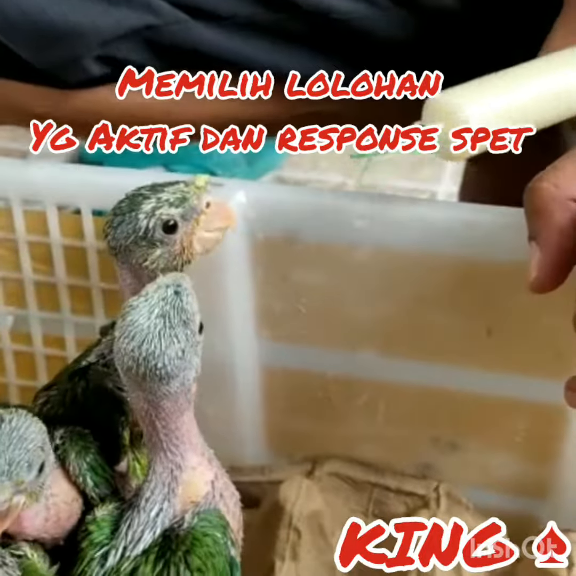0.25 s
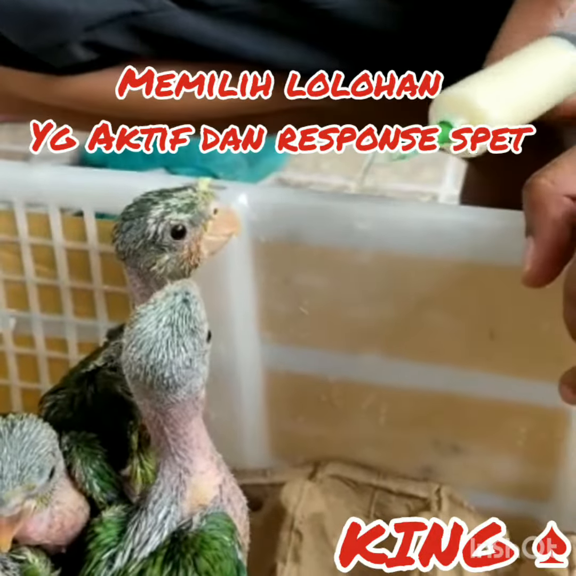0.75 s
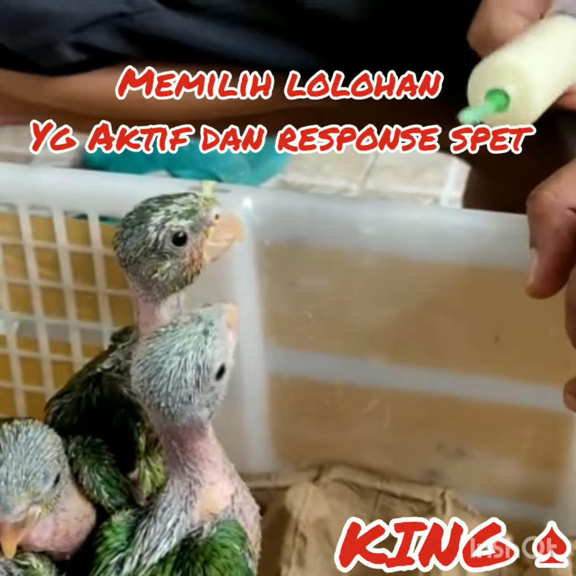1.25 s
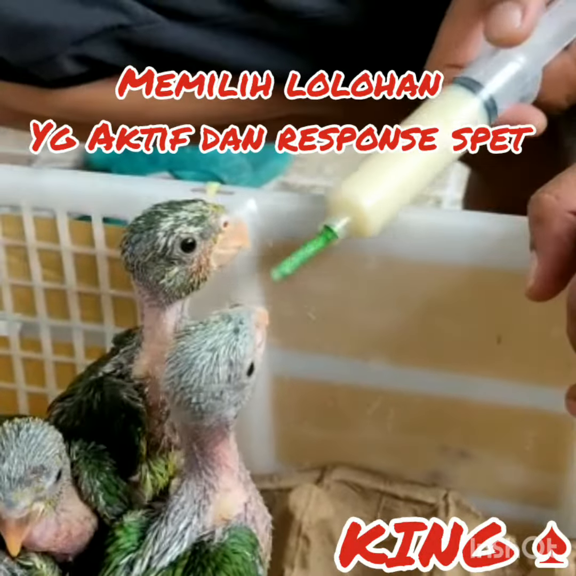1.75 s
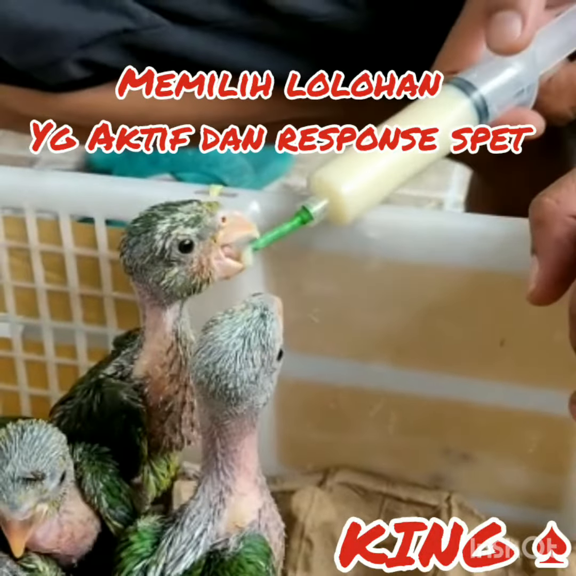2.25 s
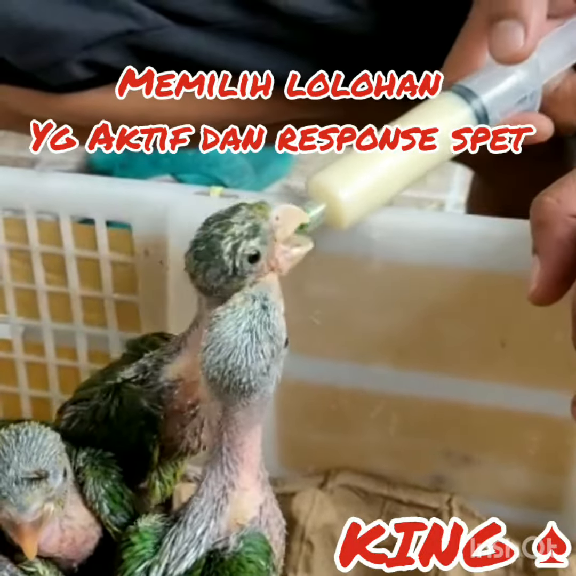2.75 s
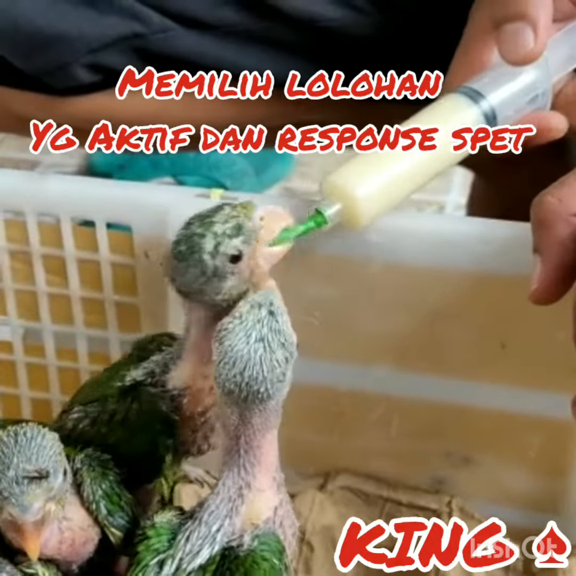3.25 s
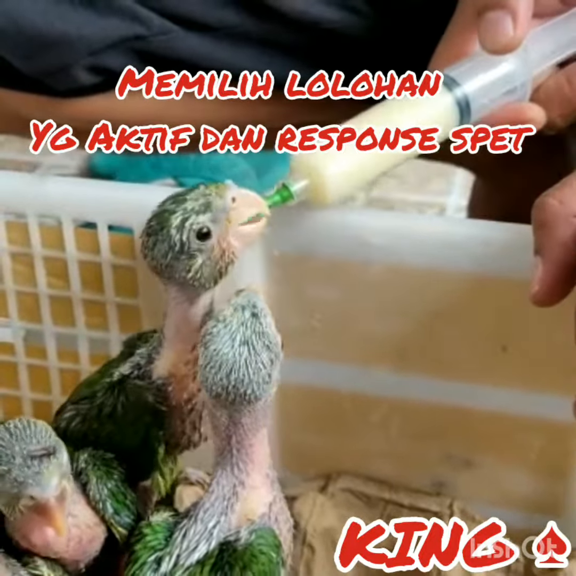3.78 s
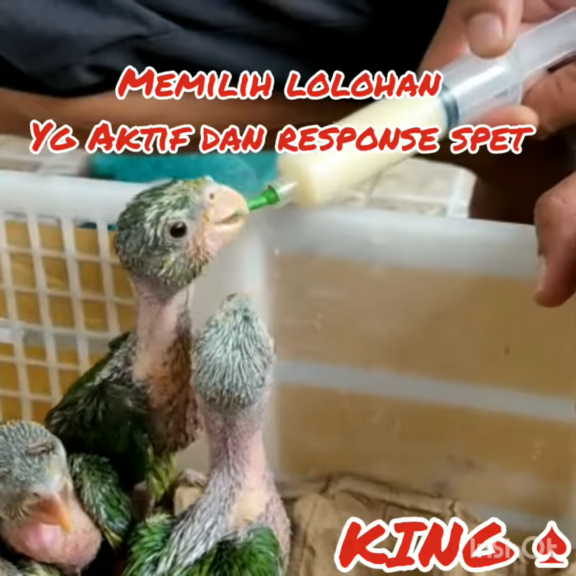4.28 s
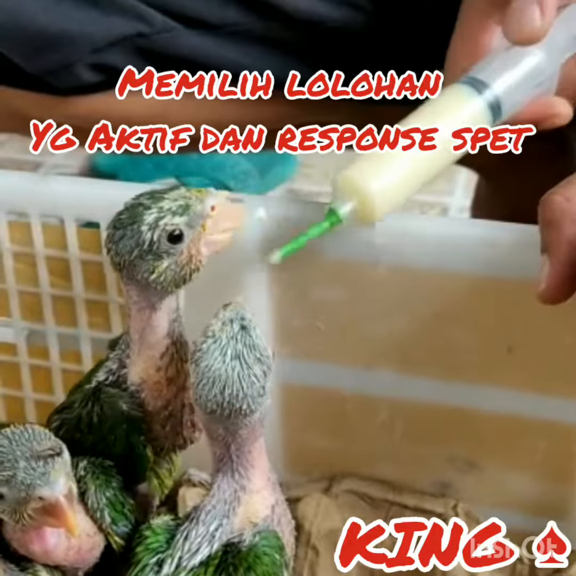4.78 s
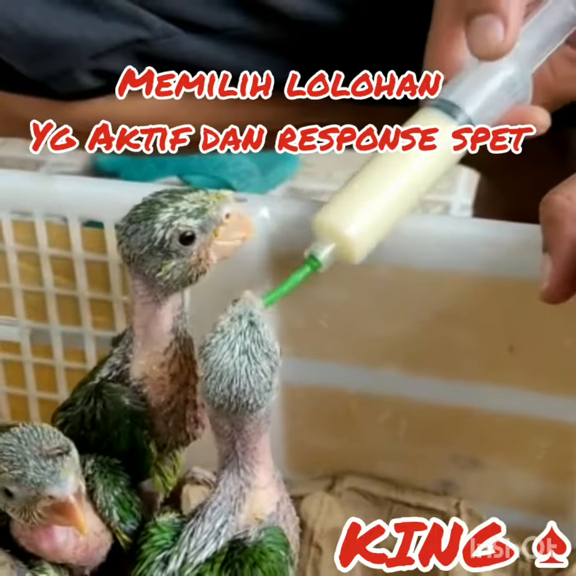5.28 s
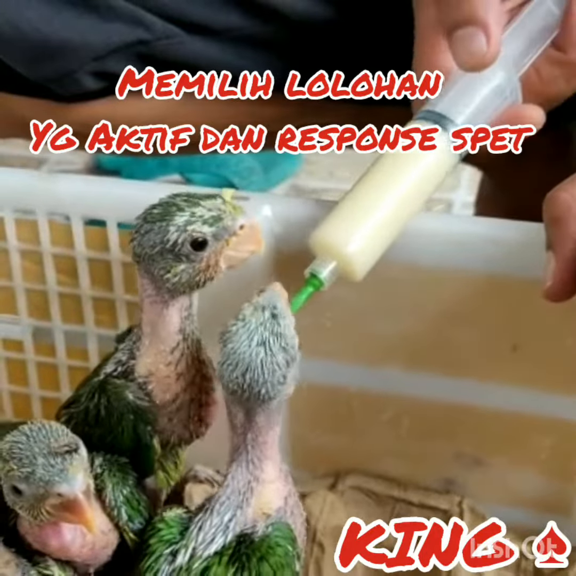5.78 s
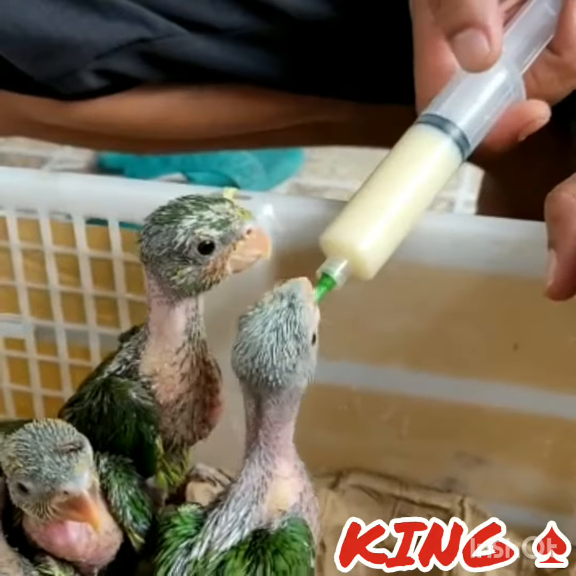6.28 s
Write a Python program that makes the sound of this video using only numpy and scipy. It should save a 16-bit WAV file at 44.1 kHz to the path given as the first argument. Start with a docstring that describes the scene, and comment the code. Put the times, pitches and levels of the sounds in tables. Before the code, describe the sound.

Close raspy begging calls from young parakeets come in three separated bursts over a faint room hum, with soft bumps, wet clicks and one late distant peep.

```python
"""Parakeet chicks in a plastic tub beg in three bursts, close to a stereo microphone, while a syringe feeds them.
Each call starts as an irregular rasp, snaps into a short arched squeal of eight partials and falls back into rasp.
A small room hums under it, with faint swells of hiss; the tub is bumped, beaks tick and husky chirps slip out.
Near the end a bird peeps further off, a wavering whistle heard mostly by way of the room.
Bumps are decaying tones and clacks, ticks are noise clicks, and the walls and room answer with noise echoes."""
import sys
import numpy as np
from scipy import signal
from scipy.fft import rfft, irfft, next_fast_len
from scipy.io import wavfile
from scipy.ndimage import uniform_filter1d

SR = 44100
rng = np.random.default_rng(int(sys.argv[2]) if len(sys.argv) > 2 else 0)


def pcm_store(signal):
    """Save signal as 16-bit PCM."""
    levels = np.round(np.clip(np.atleast_2d(signal), -1, 1) * 32767)
    wavfile.write(sys.argv[1], SR, levels.astype(np.int16).T)


N = 287973


def amp(db):
    """Decibels to gain."""
    return 10 ** (np.asarray(db) / 20)


def unit(x):
    """Scale to rms 1."""
    return x / np.sqrt(np.mean(x ** 2) + 1e-20)


def along(points, hz, axis=1):
    """Read one column of a frequency table on a log axis."""
    table = np.array(points, float)
    return np.interp(np.log(hz + 1), np.log(table[:, 0] + 1), table[:, axis])


def curves(rows, t):
    """Each column after the time, read at times t."""
    s, *cols = np.transpose(rows)
    return [np.interp(t, s, c) for c in cols]


def add(track, s, sound):
    """Mix a sound into a track from time s."""
    start = round(s * SR)
    part = sound[max(-start, 0):max(N - start, 0)]
    track[max(start, 0):][:len(part)] += part


def filtered(x, response):
    """x times a response of frequency."""
    length = x.shape[-1]
    size = 2 * next_fast_len(length // 2 + SR // 8)
    return irfft(rfft(x, size) * response(np.fft.rfftfreq(size, 1 / SR)), size)[..., :length]


def causal(gain):
    """The minimum-phase response with this gain."""
    cepstrum = irfft(np.log(np.maximum(gain, 1e-6)))
    half = len(cepstrum) // 2
    cepstrum[1:half] *= 2
    cepstrum[half + 1:] = 0
    return np.exp(rfft(cepstrum))


def band(hz, centre_hz, half_width_hz):
    """A resonance with steep skirts, 6 dB down at the half width."""
    return 1 / (1 + 1j * (hz - centre_hz) / half_width_hz) ** 2


def rush(gain, side_db):
    """Coloured stereo noise of rms 1."""
    mid, side = filtered(rng.standard_normal((2, N)), gain)
    side = amp(side_db) * side
    return unit(np.array([mid + side, mid - side]))


def rasp(t, before, after, effort, scatter_db, air, uneven):
    """Loose membranes slap irregularly, faster as they tighten towards the squeal; each slap lets out a puff of air."""
    # mean slap rate [Hz]: at the start of the rasp, next to the squeal, at the end
    flap_rates = (560.4, 1198.7, 622.6)
    slack_hz, tight_hz, spent_hz = flap_rates
    flap_hz = np.interp(t, [-before, 0, .028, after], [slack_hz, tight_hz, tight_hz, spent_hz])
    turns = np.cumsum(1 + min(uneven, 1) * rng.uniform(-1, 1, size=len(t) // 16))
    at = np.searchsorted(np.cumsum(flap_hz) / SR, turns)
    at = at[at < len(t)]

    slaps = np.zeros(len(t))
    strength_db = scatter_db * np.clip(rng.standard_normal(len(at)), -2, 1)
    slaps[at] = amp(strength_db) / np.sqrt(flap_hz[at])
    puff_decay = np.exp(-1 / (SR * 0.0014))
    puffs = signal.lfilter([1], [1, -puff_decay], slaps) * rng.standard_normal(len(t))
    slaps = slaps - uniform_filter1d(slaps, size=128)  # takes out the slow push

    # the rasp swells, thins while the squeal holds, returns and dies away
    start_db, swell_db, locked_db, return_db, late_db = effort
    when = [-before - .004, -before + 0.0059, -.002, .005, .022, .029, after - .012, after, after + 0.024]
    levels = [-45, start_db, swell_db, locked_db, locked_db, return_db, late_db, late_db - 7.0, -32]
    effort_db = np.interp(t, when, levels, left=-120, right=-120)
    return unit(unit(slaps) + air * unit(puffs)) * amp(effort_db)


def squeal(t, top_hz, chick, syrinx, jitter, vary_db):
    """The membranes lock into a regular vibration; their tension, and so the pitch, rises to a crest and drops faster."""
    crest, rise, fall, attack, length, shimmer_db, crest_db = chick
    arch_sag, arch_power = .29, 2.1  # log pitch lost one rise or fall time off the crest; flatness of the crest
    lowest_share, release_s = .6, 0.0089  # lowest pitch over top pitch; time the squeal takes to break up
    slack_jitter = 0.041  # extra unsteadiness per share of pitch lost: slack membranes wobble
    lead_s = 0.0031  # the fundamental sounds this much before and after its overtones

    def waver():
        return unit(uniform_filter1d(rng.standard_normal(len(t)), size=20))

    def gate(lead):
        """The squeal breaks in and out within a few milliseconds."""
        opening = np.clip((t + lead) / attack + .5, 0, 1)
        closing = np.clip((length + lead - t) / release_s + .5, 0, 1)
        return opening * closing

    off_crest = np.abs((t - crest) / np.where(t < crest, rise, fall))
    arch = np.maximum(np.exp(-arch_sag * off_crest ** arch_power), lowest_share)
    pitch = top_hz * arch * (1 + (jitter + slack_jitter * (1 - arch)) * waver())
    phase = 2 * np.pi * np.cumsum(pitch) / SR

    partials = np.zeros(len(t))
    for k in range(1, 9):
        # the balance of partials differs from call to call
        strength = amp(along(syrinx, k * pitch) + rng.normal(0, vary_db))
        partials += strength * gate(lead_s * (k == 1)) * np.sin(k * phase)
    # the tight membranes swing less at the crest than on the way up and down
    return partials * amp(shimmer_db * waver() + crest_db * np.exp(-(off_crest / 0.75) ** 2))


def radiate(source, beak):
    """Throat and beak colour the call, which reaches the two ports by different paths."""
    def response(hz):
        throat = causal(unit(amp(along(beak, hz))))
        tilt = amp(along(beak, hz, axis=2) / 2)
        turn = np.exp(.5j * along(beak, hz, axis=3))
        ports = np.array([tilt * turn, 1 / (tilt * turn)])
        return throat * ports / np.sqrt((tilt ** 2 + tilt ** -2) / 2)
    return filtered(source, response)


def tub_walls(x, t60):
    """Quick, weak reflections between the walls of the tub."""
    t = np.arange(SR // 20) / SR
    echoes = rng.standard_normal((2, len(t))) * amp(-60 * t / t60) * (t > .001)
    echoes = echoes / np.linalg.norm(echoes, axis=1, keepdims=True)
    return signal.fftconvolve(np.atleast_2d(x), echoes, axes=1)[:, :N]


def room(x, gap):
    """A diffuse tail, faded in over the gap [s], in which each frequency dies at its own speed."""
    # decay of the small room: (f/Hz, t60/s)
    decay = [(200, 1), (1000, 0.91), (3500, 0.39), (7000, 0.385), (14000, 0.19)]
    hz, t, z = signal.stft(rng.standard_normal((2, SR * 3 // 4)), SR, nperseg=256)
    tail = signal.istft(z * amp(-60 * t / along(decay, hz)[:, None]), SR, nperseg=256)[1]
    tail = tail * np.clip(np.arange(tail.shape[1]) / SR / gap, 0, 1)
    return signal.fftconvolve(np.atleast_2d(x), tail / np.linalg.norm(tail[0]), axes=1)[:, :N]


def thin_centre(pair, centre_hz, half_width_hz, depth_db):
    """Lowers the centre of the stereo image in one narrow band."""
    mid, side = (pair[0] + pair[1]) / 2, (pair[0] - pair[1]) / 2

    def dip(hz):
        return causal(amp(depth_db / (1 + ((hz - centre_hz) / half_width_hz) ** 4)))
    mid = filtered(mid, dip)
    return np.array([mid + side, mid - side])


def begging():
    """One chick gives the first two bursts; a lower, rougher one with a softer attack gives the third.
    The head holds its place through a burst, so its calls are much alike."""
    # begging calls: (squeal onset t/s, top pitch f/Hz, squeal level/dB, rasp level/dB,
    #                 rasp before t/s, rasp after t/s, burst counted from 0)
    begs = [(0.0434, 1977, -17.5, -16, .044, .046, 0), (.1650, 1925, -17, -16.5, .035, .044, 0),
            (0.3067, 1896, -17.5, -16, .036, .043, 0), (2.4955, 2005, -16, -15, .039, 0.046, 1),
            (2.5986, 2070, -15.5, -14.5, .044, .05, 1), (2.7167, 2014, -15.5, -14, .044, .046, 1),
            (2.8518, 1943, -16.5, -16.5, .038, .049, 1), (4.2899, 1825, -16.5, -17.5, .031, .053, 2),
            (4.3842, 1848, -15.5, -16.5, .031, .05, 2), (4.4948, 1839, -15.5, -14.5, .028, .046, 2),
            (4.6191, 1830, -16, -17, .033, .051, 2)]
    # each chick's squeal: (onset to crest t/s, pitch rise t/s, pitch fall t/s, attack t/s, length t/s,
    #                       rough shimmer level/dB, level at the crest/dB)
    chick_a, chick_b = (.0172, .0136, .0093, .0045, 0.028, 1.0, -1.8), (.018, .0174, .016, 0.012, 0.025, 1.7, -1.2)
    # strength of the squeal's partials at the syrinx: (f/Hz, level/dB)
    syrinx_a, syrinx_b = [(1200, -7.5), (1500, -10), (2000, -10), (2700, -3), (3300, -3), (4000, -0.5),
                          (5000, -6), (6000, -2.5), (6800, 4), (7700, -8.5), (8700, -1), (11000, -7.5),
                          (15000, -14)], [(1200, -12), (1850, -6.5), (2500, 0), (3300, 0.5), (3700, -2.5),
                                            (4500, -6.5), (5400, -4), (6200, 0.5), (6700, -9), (7300, 0.5),
                                            (9200, -1), (11000, -4), (15000, -10)]
    # effort in each chick's rasp, level/dB: (at its start, just before the squeal, under it, just after it, late)
    effort_a, effort_b = (-11.5, -3.5, -11, -1.5, -2.5), (-15.5, 1, -8.5, 0.5, -3.5)
    # throat, beak and head direction in each burst:
    # (f/Hz, relative level/dB, left minus right level/dB, left phase lead [rad])
    beak_1, beak_2, beak_3 = [(39.7, -23, 4, 1.5), (170.0, -15, 3, -0.3), (350.0, -18.5, 4, 1),
                              (804, -19.0, 1.5, -1.0), (1050, -24.5, -1, 0.5), (1247, -14.0, 0, -1.5),
                              (1450, -16, -3.5, -2.5), (1760, -11, -0.5, -2.5), (2000.0, -10.5, 1, -3.5),
                              (2470, -13, 7.5, -1), (2927, -11.5, -2.0, -0.95), (3310, -12.5, 1, -2.5),
                              (3500, -11.0, 0, -4), (4060, -10, -1.5, -4.5), (4170, -9, -1.5, -8.5),
                              (4600, -9.5, -3.5, -4.5), (5030, -12.5, -7.5, -4), (5334, -5, 6.0, -6),
                              (6000, 0.0, 6.5, -7.5), (6100.0, -6, 8.0, -11), (6510, -5, 8.5, -11),
                              (6840, -6.5, 4.5, -12.5), (7347, -9, -0.5, -14.5), (7440, -12.0, -3.5, -14.5),
                              (8870, -16, -10.0, -14), (8950.0, -21, -11, -12), (9400, -30, -1.5, -11),
                              (10615, -22.5, -5.5, -11.5), (11600, -21.5, -1, -13.0),
                              (13300.0, -33.0, -1.5, -16), (15000.0, -30.5, -4.5, -14)], [(40.0, -23.5, 2, 2.5), (169.4, -12, 1.5, -2),
                                              (350.0, -15.5, -0.5, 1.07), (804, -12.5, 1, -1.5),
                                              (1060, -15, 3.5, -1.76), (1240, -14, -5, -0.9),
                                              (1480, -9.5, 3, -3.0), (1742, -7, 0.0, -3),
                                              (2007, -6.5, 2, -2.5), (2412, -7.5, 2, -2.5),
                                              (2855, -8, -1.5, -2), (3340, -12, -1, -1.1),
                                              (3586, -6.5, -0.5, 3.5), (3980, -7, 1.5, 1.6),
                                              (4150, -1.5, 2.5, 0.54), (4508, -5.5, -1, 0.3),
                                              (4980, -7, -2.5, -1.1), (5430, -6, -4, -2.5),
                                              (5830, -2.5, -5, 0.5), (6045, -1.5, 7.5, -2.5),
                                              (6500.0, -2.5, -1, -5), (6823, -2, 1.5, -4.5),
                                              (7480, -5, 2.5, -5), (7873, -14.5, 0.5, -3.5),
                                              (8440, -14, -1.0, -5), (8950.0, -17.5, -1, -8),
                                              (9600.0, -26, -1.5, -9.5), (10400, -24.5, 0.5, -9),
                                              (11450, -15.5, 1.5, -7.5), (13300.0, -34.5, -0.5, -10),
                                              (15000.0, -27, -3, -7)], [(40.0, -17, 2.5, 0.2), (170.6, -14.5, 4, 0.1),
                                                              (349.7, -15.5, 1.5, 0.2),
                                                              (785, -8.5, 1.5, 1.0), (1049, -9.0, 0, 1.7),
                                                              (1251, -5, 1.0, 2.4), (1500.0, -5, -3, 3.0),
                                                              (1780, 2, 4, 3.2), (2020, -3.5, -1.5, 3.2),
                                                              (2360, -3, 5.5, 5.0), (2920, -3.5, 9, 4.6),
                                                              (3304, -4, 9, 4.7), (3400, 0.5, 5, 4.6),
                                                              (3900.0, -1, 2.5, 4.7),
                                                              (4230, -8.0, 0.0, 6.3), (4660, -9, -2, 7.2),
                                                              (4925, -6.0, -7.5, 8.5),
                                                              (5470, -1, -3.5, 8.8), (5510, -1, 5.0, 10.2),
                                                              (6080, -5.5, 4, 11), (6440, -4, 0.5, 10.2),
                                                              (6650, -2, 5, 11.03), (7400, -1.5, 5, 10.84),
                                                              (8000, -5.5, 0.5, 10), (8630, -16, -1, 12.9),
                                                              (8950.0, -14.5, 7, 15.3),
                                                              (9400, -23.5, 6.5, 18),
                                                              (11000, -18, -1.5, 12.4),
                                                              (11500.0, -28.5, 3.5, 33),
                                                              (13370, -29.5, 6, 13), (15070, -28, 8, 20)]
    # narrow band where the centre is thinned, in each burst: (centre f/Hz, half width f/Hz, depth level/dB)
    centre_dips = [(1820, 230, -18), (1720, 220, -13.5), (1650, 160, -6)]

    t = np.arange(-SR // 16, SR // 6) / SR
    voices = [(chick_a, syrinx_a, effort_a, beak_1),
              (chick_a, syrinx_a, effort_a, beak_2),
              (chick_b, syrinx_b, effort_b, beak_3)]
    pair = np.zeros((2, N))
    for s, top_hz, squeal_db, rasp_db, before, after, burst in begs:
        burst = round(burst)
        chick, syrinx, effort, beak = voices[burst]
        clear = squeal(t, top_hz, chick, syrinx, jitter=0.0057, vary_db=0.82)
        rough = rasp(t, before, after, effort, scatter_db=2.0, air=.6, uneven=.38)
        call = radiate(amp(squeal_db) * clear + amp(rasp_db) * rough, beak)
        off_walls = amp(-8.0) * tub_walls(call, t60=.033)
        off_room = amp(-18) * room(call, gap=0.01)
        for path in call, off_walls, off_room:
            for port, sound in zip(pair, thin_centre(path, *centre_dips[burst])):
                add(port, s + t[0], sound)
    return pair


def background(rumble_db, middle_db):
    """Steady room noise with a wavering hum and brief faint tones."""
    # spectra of the low and the middle room noise: (f/Hz, relative level/dB per Hz)
    rumble_shape, middle_shape = [(15, -70), (25, -32), (49, -17.5), (86, 0.5), (162, -5), (183, -2.5),
                                  (227, -3), (269, -9.5), (324, -17), (402, -15), (462, -14), (1000, -23),
                                  (1300, -53.5), (2200, -120)], [(500, -3.5), (900, -1), (1400, -3.5), (2300, -12),
                                                  (2750, -30), (4000, -41), (12000, -54)]
    # room resonances: (f/Hz, width f/Hz, level/dB)
    resonances = [(188, 33, -56), (218.44, 9.5, -58)]
    # faint passing tones: (start t/s, end t/s, f/Hz, level/dB)
    passing = [(0.349, 0.634, 193.7, -45), (0.93, 1.009, 520, -57.5), (1.947, 2.02, 549, -58.5),
               (5.42, 5.51, 590, -58), (6.03, 6.13, 730, -57), (6.422, 6.58, 1078, -61.5)]
    t = np.arange(N) / SR
    bass_side_db = -10
    rumble = amp(rumble_db) * rush(lambda hz: amp(along(rumble_shape, hz)), bass_side_db)
    hum = sum(amp(db) * rush(lambda hz: band(hz, centre_hz, width_hz / 2), bass_side_db)
              for centre_hz, width_hz, db in resonances)
    middle = amp(middle_db) * rush(lambda hz: amp(along(middle_shape, hz)), side_db=1.0)
    tones = np.zeros(N)
    for start, end, hz, db in passing:
        fade = np.clip(np.minimum(t - start, end - t) / 0.022, 0, 1)
        tones += amp(db) * fade * np.sin(2 * np.pi * hz * t)
    return rumble + hum + middle + tones


def hiss(floor_db):
    """A faint airy hiss, shaped noise over a steady floor, swells and fades."""
    # spectrum of the hiss: (f/Hz, relative level/dB per Hz)
    shape = [(400, -16), (900, -0.5), (1600, -1), (2300, -1.5), (3000, -14.5), (4200, -20.5), (5500, -12),
             (6900, 3.5), (8000, -12), (10500, -18.5), (15000, -28)]
    # faint swells outside the bursts: (centre t/s, length t/s, level/dB)
    swells = [(0.668, 0.23, -63), (1.325, 0.17, -71), (1.86, 0.15, -64.5), (2.141, 0.13, -65),
              (3.069, 0.21, -57.5), (3.517, 0.196, -64), (4.134, 0.14, -59), (5.28, 0.15, -63),
              (5.82, 0.23, -59), (6.469, .18, -58.5)]
    steepness = 2.4  # of a swell's flanks
    t = np.arange(N) / SR
    swell = sum(amp(db) * np.exp(-.5 * np.abs(2 * (t - s) / length) ** steepness) for s, length, db in swells)
    return (swell + amp(floor_db)) * rush(lambda hz: amp(along(shape, hz)), side_db=-1.0)


def bumps():
    """Dull knocks briefly ring the tub; soft pushes add a low thud, harder contacts a short clack."""
    # bumps on the tub: (t/s, level/dB, hard edge relative level/dB, soft thud relative level/dB, pitch factor)
    knocks = [(0.681, -46.5, 13.5, -10, 1.2), (1.7602, -24.5, -14, -1, 0.97),
              (2.0177, -27.5, -5, -11, 1.03), (3.394, -65.5, 24, -10.5, 0.78), (3.447, -60, 15.5, -10, 1.1),
              (4.894, -44, 18, -4, 1.3), (5.211, -35, -12, 1.5, 1.02), (5.436, -36.5, -13, 4, 0.96),
              (5.681, -49.5, 10.5, -9.5, 0.88), (5.697, -31, -13, 2.5, 1.023), (5.988, -41, -9, 3, 0.97)]
    # modes of the tub before the pitch factor: (f/Hz, mean level/dB, t60/s)
    modes = [(235, -13, .04), (328.3, -11.5, .07), (400, 1, 0.045), (480, -14, .03), (788, -8, 0.024),
             (1061, -22, 0.03)]
    lowest_hz = 70  # the tub radiates little below this
    thud_hz, thud_t60_s = 150, 0.055  # the whole tub rocking under a soft push
    t = np.arange(SR // 5) / SR
    rings, clacks = np.zeros((2, N))
    for s, db, edge_db, thud_db, pitch in knocks:
        ring = sum(amp(level + rng.normal(0, 4.1) - 60 * t / t60) * np.sin(2 * np.pi * pitch * hz * t)
                   for hz, level, t60 in modes)
        thud = amp(thud_db - 60 * t / thud_t60_s) * np.sin(2 * np.pi * thud_hz * t)
        onset = 1 - np.exp(-t / 0.00092)
        add(rings, s, -amp(db) * (ring + thud) * onset)
        add(clacks, s, amp(db + edge_db - 60 * t / 0.013) * rng.standard_normal(len(t)))
    # colour of the clack: (f/Hz, level/dB)
    plastic = [(200, -10), (600, 18.5), (1200, 7), (2500, -6.5), (3500, -26), (12000, -36)]
    highpass = signal.butter(2, lowest_hz, 'highpass', fs=SR, output='sos')
    rings = signal.sosfilt(highpass, rings)
    return rings + filtered(clacks, lambda hz: causal(amp(along(plastic, hz))))


def ticks(level_db, t60):
    """Tiny wet clicks of beak and food on the nozzle: decaying noise, separate at each port."""
    # beak ticks: (t/s, level/dB before the common level)
    clicks = [(0.7317, -45), (0.808, -53), (.846, -56.5), (0.9971, -54), (1.043, -52), (1.4382, -46.5),
              (1.8557, -43.5), (1.928, -51.5), (2.0015, -38), (2.058, -39), (2.0634, -34.5),
              (2.1455, -39.5), (2.158, -44), (2.176, -46.5), (2.2197, -42.5), (2.372, -45), (2.3806, -42),
              (2.445, -42), (3.0636, -35), (3.1257, -32.5), (3.174, -41), (3.236, -44.5), (3.393, -46.5),
              (4.034, -49), (5.026, -48.5)]
    t = np.arange(SR // 20) / SR
    pair = np.zeros((2, N))
    for s, db in clicks:
        for port in pair:
            add(port, s, amp(db + level_db - 60 * t / t60) * rng.standard_normal(len(t)))
    # colour of the beak: (f/Hz, relative level/dB)
    horn = [(800, -14.0), (2500, -7.5), (3000, -6), (4000, -18.0), (5200, -6.5), (5750, 4.5),
            (6150, -1.5), (6600, 6.5), (7200, 0), (8000, -21), (14000, -30.0)]
    return filtered(pair, lambda hz: causal(unit(amp(along(horn, hz)))))


def chirps():
    """Half-hearted calls that never lock into a squeal: short swells of band noise."""
    # weak husky chirps: (centre t/s, level/dB, length t/s, centre f/Hz, width f/Hz)
    husky_calls = [(4.589, -22.5, 0.016, 2250, 550), (4.587, -32.5, 0.017, 5800, 2500),
                   (4.853, -40.5, 0.02394, 2480, 2300), (4.853, -40, 0.0271, 6430, 1500),
                   (4.897, -43, 0.033, 6230, 2600)]
    t = np.arange(N) / SR
    pair = np.zeros((2, N))
    for s, db, length, centre_hz, width_hz in husky_calls:
        swell = np.exp(-(2 * (t - s) / length) ** 2)
        pair += amp(db) * swell * rush(lambda hz: band(hz, centre_hz, width_hz / 2), side_db=-2.5)
    return pair


def peep(overtone_db, flutter, husk_db):
    """A thin, husky, wavering whistle from another bird across the room."""
    # course of the whistle: (t/s, f/Hz, level/dB)
    course = [(6.187, 6620, -42), (6.204, 6390, -28.5), (6.225, 6640, -37), (6.25, 6560, -40),
              (6.3, 6600, -55)]
    t = np.arange(N) / SR
    pitch, db = curves(course, t)

    def waver(speed_hz):
        return unit(filtered(rng.standard_normal(N), lambda hz: np.exp(-(hz / speed_hz) ** 4)))

    phase = 2 * np.pi * np.cumsum(pitch * (1 + flutter * waver(speed_hz=261))) / SR
    gate = np.clip((t - course[0][0]) / 0.006, 0, 1) * np.clip((course[-1][0] - t) / 0.0096, 0, 1)
    husky = unit(1 + amp(husk_db) * waver(speed_hz=290))
    return amp(db) * gate * husky * (np.sin(phase) + amp(overtone_db) * np.sin(2 * phase))


def scene():
    """Chicks and tub are near and dry; the peep comes mostly by way of the room."""
    calls = begging()
    small = chirps() + bumps() + ticks(level_db=-3.5, t60=0.018)
    small = small + amp(-10.0) * tub_walls(small, t60=0.05) + amp(-16.0) * room(small, gap=.012)
    far = peep(overtone_db=-36.0, flutter=0.007, husk_db=-2)
    far = amp(-7.0) * far + amp(-1.0) * tub_walls(far, t60=0.0217) + amp(0.0) * room(far, gap=0.0053)
    return calls + small + far + hiss(floor_db=-97) + background(rumble_db=-51.0, middle_db=-65)


def record(dry):
    """The loudest peaks are rounded off, and nothing passes above the band limit."""
    ceiling, top_hz = .95, 15830
    rounded = dry / (1 + np.abs(dry / ceiling) ** 6) ** (1 / 6)
    return filtered(rounded, lambda hz: hz < top_hz)


dry = scene()
out = record(dry)
pcm_store(out)
```